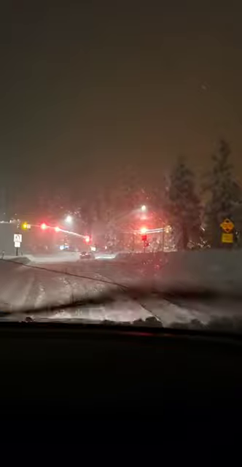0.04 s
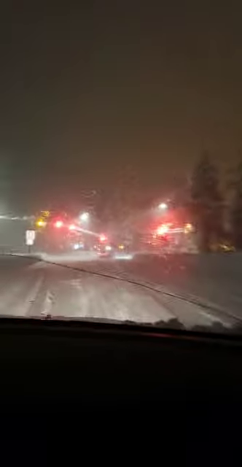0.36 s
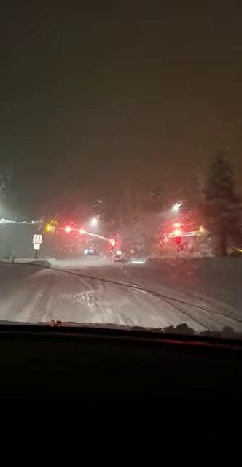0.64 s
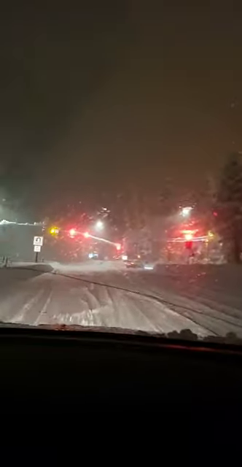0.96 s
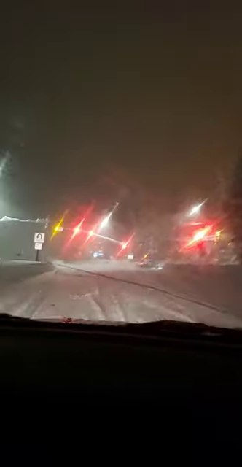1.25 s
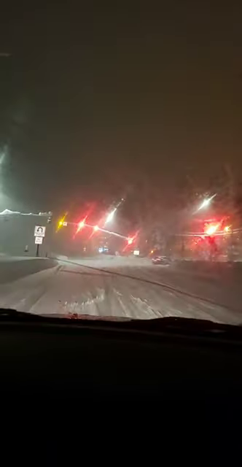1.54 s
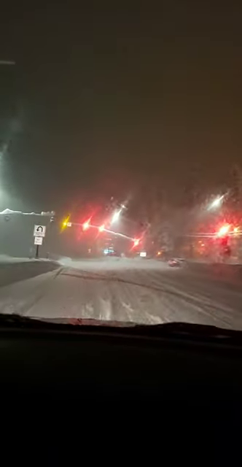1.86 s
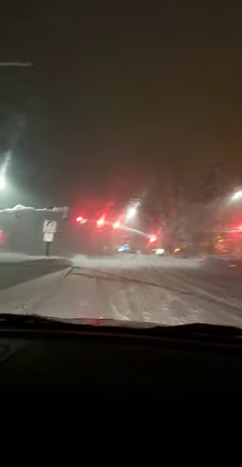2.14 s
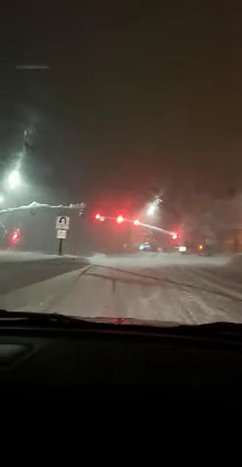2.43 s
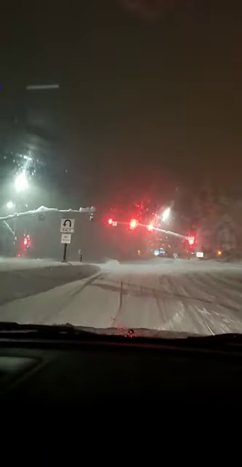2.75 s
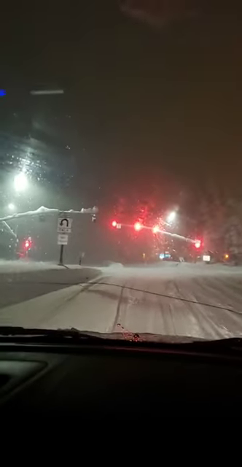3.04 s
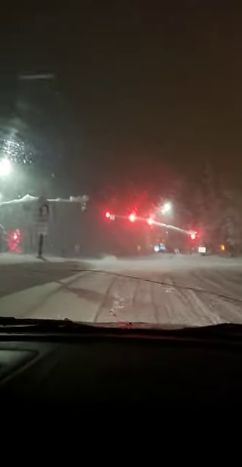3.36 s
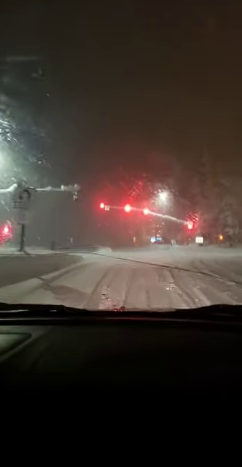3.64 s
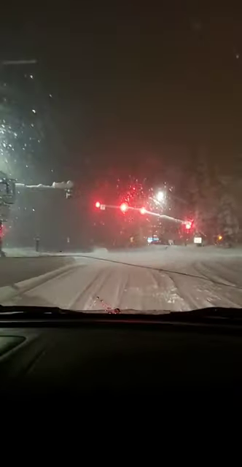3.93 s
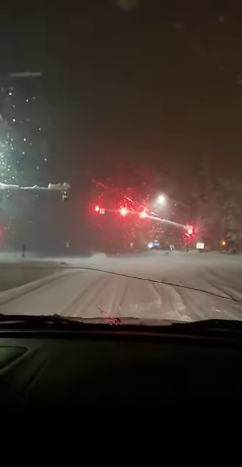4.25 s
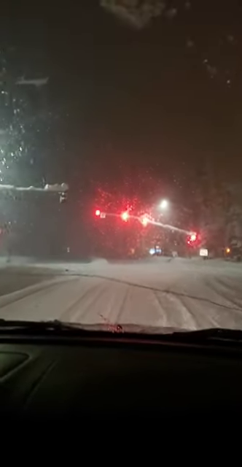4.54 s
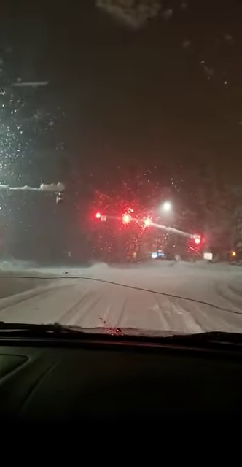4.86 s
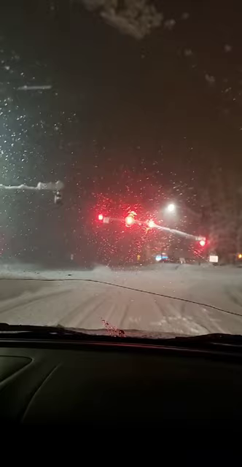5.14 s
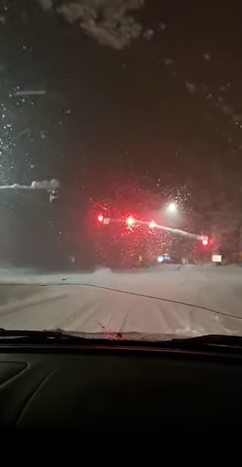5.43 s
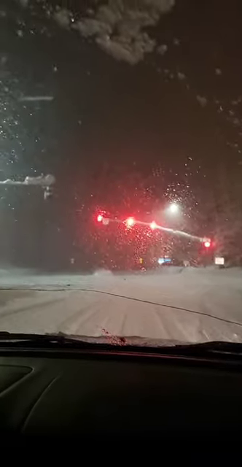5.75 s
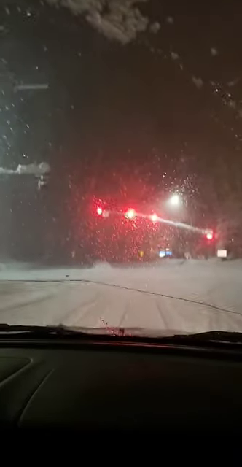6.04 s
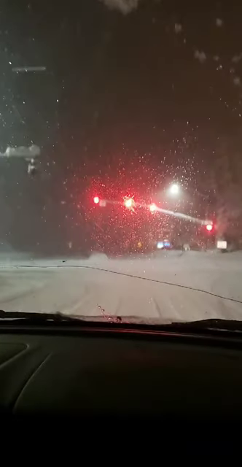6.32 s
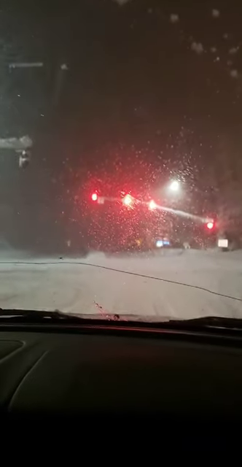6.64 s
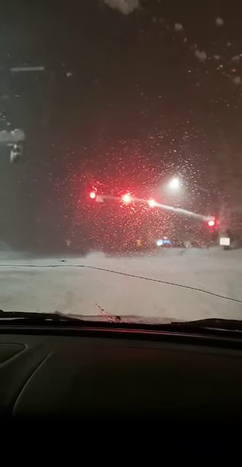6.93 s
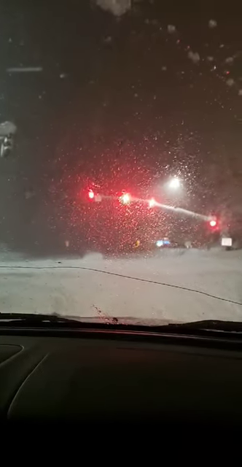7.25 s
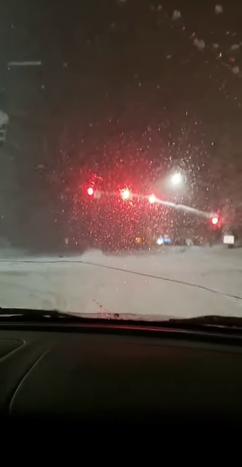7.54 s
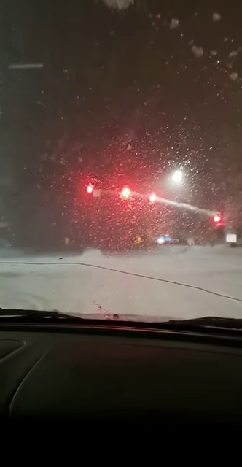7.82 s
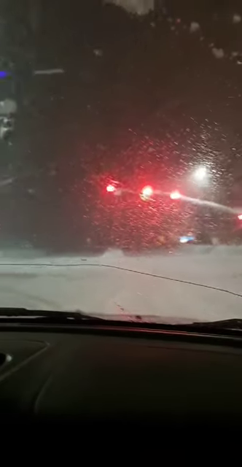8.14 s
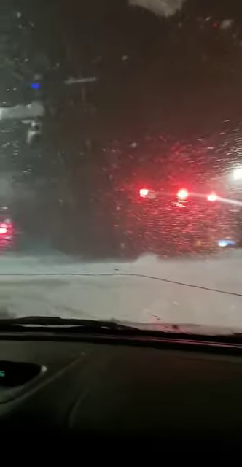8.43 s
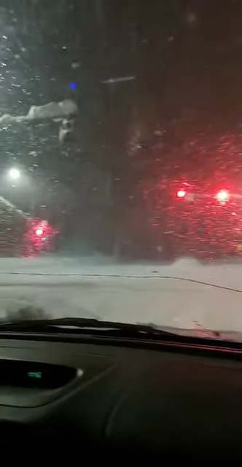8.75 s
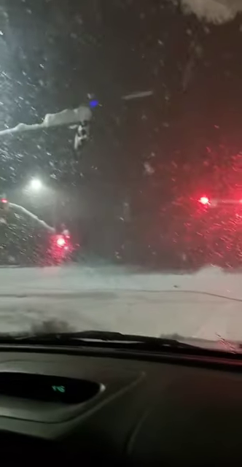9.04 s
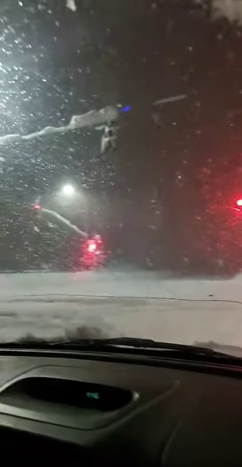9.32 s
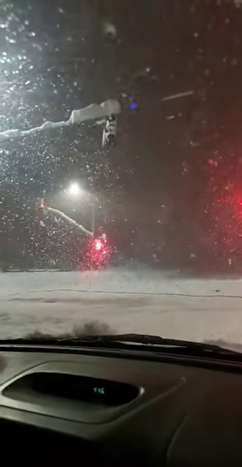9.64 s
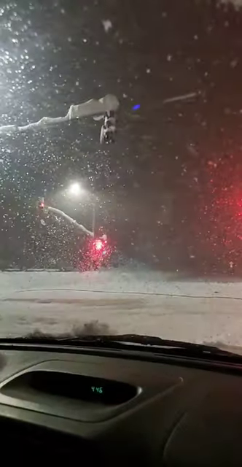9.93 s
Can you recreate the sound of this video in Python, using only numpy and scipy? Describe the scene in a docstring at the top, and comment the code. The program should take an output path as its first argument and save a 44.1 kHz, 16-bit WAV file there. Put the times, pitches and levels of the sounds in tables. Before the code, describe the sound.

A brief burst of close handling noise opens on a hand-held phone inside a moving car. Low road rumble carries on throughout, its hum dropping in pitch as the car slows over rutted snow. The wheels jolt softly a few times and loose plastic rattles faintly, while the heater blows steadily behind. Toward the end the boom eases a little, and light ticks and cloth rustle come from the grip.

```python
"""Low road rumble inside a car slowing down on snow, heard from a hand-held phone.
The wheels shake the cabin into a boom; the running-gear drone and the tread hum sink with the speed.
A hand scrapes over the phone at the start, and heater air rushes steadily through the ducts.
Small details sit behind: loose trim rattles on bumps, the case ticks in the grip,
a sleeve swishes, and skin and cloth squeak as they catch."""
import sys
import numpy as np
from scipy import signal
from scipy.fft import rfft, irfft
from scipy.io import wavfile
from scipy.ndimage import uniform_filter1d

SR = 44100
rng = np.random.default_rng(int(sys.argv[2]) if len(sys.argv) > 2 else 0)


def transcribe(signal):
    """Save signal, clipped to [-1, 1], as a 16-bit WAV file at the path in sys.argv[1]."""
    frames = np.atleast_2d(signal).T
    limited = np.clip(frames, -1, 1)
    pcm = np.round(limited * 32767).astype(np.int16)
    wavfile.write(sys.argv[1], SR, pcm)


N = 440118

BODY_DB, BOOM_DB, SNOW_DB, ROAR_DB = -34.5, -36.5, -43.5, -50.5  # base levels at cruising speed
BOOM_FALL_DB, SNOW_FALL_DB, ROAR_FALL_DB, DRONE_FALL_DB = 2.5, 4.5, 5.5, 2.5  # per halving of speed
DRONE_HZ, DRONE_DB, TREAD_HZ, TREAD_DB = 106, -44, 322.3, -55.5  # base values at cruising speed
CABIN_HZ, CABIN_WIDTH_HZ, DRONE_LIFT_DB = 82.66, 15, 16.5  # the cabin's air mode lifts the drone
FLOOR_HZ, FLOOR_WIDTH_HZ, TREAD_LIFT_DB = 174, 82, 9.5  # the floor's resonance lifts the tread hum
TURN_AIR_DB, TURN_ROAR_DB, TURN_BOOM_DB = 2.5, 3, -9.5  # mix shift as the phone turns to the vents
BUMP_SHARE = 0.65  # part of a jolt's dB that reaches the snow rumble and the tyre roar
# Braking towards a junction: (time [s], speed [share of cruising speed])
SPEED_CURVE = [(0, 0.97), (1.5, 1.004), (2.5, 0.83), (3.1, 0.79), (3.9, 0.59), (5, 0.51), (6.2, 0.39),
               (7.5, .4), (10, 0.4)]
# Road roughness, heaviest in the junction's rutted snow: (time [s], gain [dB])
RUT_CURVE = [(0, 0), (1.5, -0.5), (4.2, 4), (6.4, 4), (7.6, -0.5), (10, 1)]
# Ridges and rough patches jolting the wheels: (time [s], half length [s], boost [dB])
BUMP_CUES = [(.75, .1, 3.5), (2.85, 0.23, 4.5), (3.697, .08, 3), (4.05, 0.069, 4.5), (6.115, 0.064, 7.5),
             (6.8, 0.11, 4.5)]
# Sub-bass shake through the suspension: (frequency [Hz], gain [dB])
BODY_EQ = [(12, -24.5), (20, -11.5), (27, -9.5), (37, -1.5), (47, 1), (56, -5.5), (68, -7.5), (100, -25)]
# Rumble of packed snow under the tyres: (frequency [Hz], gain [dB])
SNOW_EQ = [(85, -19), (115, -3), (135, 2.5), (175, -0.5), (210, -7), (250, -15), (400, -42.5)]
# Low-mid tyre roar through the floor: (frequency [Hz], gain [dB])
ROAR_EQ = [(170, -11.5), (220, 2), (270, -0.5), (350, -3.5), (430, -19.5), (600, -33.5)]


def road():
    """The wheels shake the body and cabin air; drone and tread hum glide down through resonances."""
    t = np.arange(N) / SR
    speed, ruts_db, turn = curve(SPEED_CURVE), curve(RUT_CURVE), turn_to_vents()
    halvings = -np.log2(speed)
    drone_hz, tread_hz = DRONE_HZ * speed, TREAD_HZ * speed
    jolts_db = sum(db * np.exp(-((t - s) / half_s) ** 2) for s, half_s, db in BUMP_CUES)
    body_db = BODY_DB + ruts_db + jolts_db
    boom_db = BOOM_DB + ruts_db - BOOM_FALL_DB * halvings + TURN_BOOM_DB * turn
    snow_db = SNOW_DB + ruts_db + BUMP_SHARE * jolts_db - SNOW_FALL_DB * halvings
    roar_db = ROAR_DB + BUMP_SHARE * jolts_db - ROAR_FALL_DB * halvings + TURN_ROAR_DB * turn
    cabin_lift_db = DRONE_LIFT_DB * resonance(drone_hz, CABIN_HZ, CABIN_WIDTH_HZ)
    drone_db = DRONE_DB - DRONE_FALL_DB * halvings + cabin_lift_db
    tread_db = TREAD_DB + TREAD_LIFT_DB * resonance(tread_hz, FLOOR_HZ, FLOOR_WIDTH_HZ)
    body = steady(colour(noise(), BODY_EQ)) * undb(body_db)
    boom = steady(ring(noise(), [(CABIN_HZ, 22.7, 0)])) * undb(boom_db)  # lengthwise air mode
    snow = colour(noise(), SNOW_EQ) * undb(snow_db)
    roar = colour(noise(), ROAR_EQ) * undb(roar_db)
    drone = steady(hum(drone_hz, width_hz=5.8)) * undb(drone_db)
    tread = hum(tread_hz, width_hz=24) * undb(tread_db)
    return body + boom + snow + roar + drone + tread


# Strokes of the hand over the case: (start [s], length [s], level [dB])
STROKE_CUES = [(0.033, 0.05, -31), (0.082, 0.059, -27), (.16, .058, -32.5), (0.254, 0.05, -45)]
# Dark tone of friction on the case: (frequency [Hz], gain [dB])
CASE_EQ = [(120, -3), (250, 5.5), (400, 2), (600, 0), (1000, -6.5), (1800, -13), (2800, -13), (3400, -19),
           (5000, -24.5), (6800, -35.5), (8500, -49), (12000, -43), (15500, -40)]
# Ring of the scraped case: (frequency [Hz], width [Hz], gain [dB])
SCRAPE_MODES = [(272, 18, 1), (409, 26, -3), (539, 22, -5), (694, 30, 3), (776, 26, -2), (925, 22, -7),
                (962, 22, -7), (1157, 28, -13), (1529, 28, -15), (2804, 45, -15)]
# Dull boom of the case under the palm: (frequency [Hz], width [Hz], gain [dB])
PUSH_MODES = [(109.1, 17, 7), (152, 17, -13.5), (163, 34, -9), (186.6, 33, -10)]


def hand(ring_db=-8, push_db=-22):
    """Skin sticks and slips on the case and rings it, while the palm pushes out a dull boom."""
    strokes = sum(undb(db) * press(s, length, release_s=0.017) for s, length, db in STROKE_CUES)
    push = undb(push_db) * press(start_s=0.029, length_s=0.22, release_s=0.06)
    friction = slips(per_second=4600, spread_db=-1.0) * strokes
    scrape = colour(friction, CASE_EQ) + ring(friction, SCRAPE_MODES) * undb(ring_db)
    boom = steady(ring(noise(), PUSH_MODES), window_s=0.072) * push
    return scrape + boom


# Fader ride of the heater air: (time [s], level [dB])
AIR_CURVE = [(0, -57.5), (1.8, -59.5), (2.8, -58), (10, -57.5)]
# Broad rush of the air: (frequency [Hz], gain [dB])
AIR_EQ = [(200, -1.5), (450, 1.5), (590, -3), (900, -7), (1600, -9.5), (1800, -15.5), (2750, -14),
          (3200, -22), (5200, -16), (6300, -22), (7200, -35), (8200, -47), (10300, -41.5), (12500, -29.5),
          (15500, -36)]
# Hollow duct resonances: (frequency [Hz], width [Hz], boost [dB])
DUCT_PEAKS = [(685, 130, 5.5), (785, 131, 10.5), (1067, 100, 6), (1327, 110, 5.5), (1626, 36, 5.5),
              (2090, 75, 4.5), (2480, 120, 1.5), (2700, 240, 3), (4470, 150, 3.5), (6950, 270, 7)]
# Thin whine of the blower motor: (frequency [Hz], level [dB])
WHINE_TONES = [(2186, -83.5), (5238, -91.5)]


def heater(flutter_db=0.61, pitch_drift=.0006):
    """Air rushes through the ducts with a slight flutter; the motor whines faintly."""
    rush = colour(noise(), AIR_EQ, DUCT_PEAKS)
    air_db = curve(AIR_CURVE) + TURN_AIR_DB * turn_to_vents() + flutter_db * wander(2.3)
    motor_time = np.cumsum(1 + pitch_drift * wander(1.9)) / SR
    whine = sum(undb(db) * unit(np.sin(2 * np.pi * hz * motor_time)) for hz, db in WHINE_TONES)
    return rush * undb(air_db) + whine


# Fingers shifting their hold: (start [s], scuff level [dB], scuff length [s], thud level [dB])
FINGER_CUES = [(0.544, -55, 0.02, -63), (0.576, -42, 0.045, -32.5), (0.677, -55, 0.041, -53),
               (1.257, -47, 0.047, -35)]
# Soft fingertip scuff: (frequency [Hz], gain [dB])
SCUFF_EQ = [(180, -11.5), (350, 5), (650, 3.5), (1000, -2), (1800, -14), (2800, -17), (4500, -23),
            (6500, -33.5), (8500, -55)]


def fingers(thud_hz=157.0, thud_width_hz=61, thud_s=0.054):
    """A fingertip scuffs the case and lands with a soft thud."""
    scuffs = sum(undb(db) * swell(s, length) for s, db, length, _ in FINGER_CUES)
    thuds = sum(undb(db) * swell(s + length / 2, thud_s) for s, _, length, db in FINGER_CUES)
    friction = slips(per_second=4500, spread_db=7.0) * scuffs
    return colour(friction, SCUFF_EQ) + ring(noise(), [(thud_hz, thud_width_hz, 0)]) * thuds


# Skin and cloth squeaks, and a brief tick of the case near 8.47 s: (start [s], length [s], from pitch [Hz], to
# pitch [Hz], width [Hz], level [dB])
SQUEAK_CUES = [(0.256, 0.033, 700, 730, 60, -39), (0.285, 0.072, 2890, 2800, 200, -64),
               (0.326, .03, 838, 830, 59.6, -56), (0.402, 0.072, 507, 409, 65, -47),
               (0.495, 0.036, 950, 1020, 88.5, -57.5), (8.467, 0.027, 2330, 2240, 450, -56.5),
               (8.47, 0.029, 1620, 1460, 400, -55.5), (9.074, 0.073, 2110, 1950, 300, -62),
               (9.44, .1, 4430, 4300, 900, -60), (9.517, 0.095, 4950, 5150, 800, -61),
               (9.869, 0.013, 2190, 2190, 350, -61)]


def squeaks():
    """Short, ragged chirps where skin or cloth catches; the pair near 8.47 s is a tick of the case."""
    chirps = np.zeros(N)
    for s, length, start_hz, end_hz, width_hz, db in SQUEAK_CUES:
        glide_hz = curve([(s, start_hz), (s + length, end_hz)])
        chirps += hum(glide_hz, width_hz) * swell(s, length) * undb(db)
    return chirps


# The case ticking in the grip: (time [s], peak level [dB])
TICK_CUES = [(8.2065, -45.5), (8.5988, -38), (8.9704, -36), (9.1734, -38), (9.3184, -38.5)]
# Dry ring of one tick: (frequency [Hz], 60 dB decay time [s], gain [dB])
SNAP_MODES = [(2380, 0.0029, 0), (1110, 0.004, -3)]


def case_ticks(attack_s=0.00066):
    """The grip draws tiny, well damped snaps from the phone case."""
    t = np.arange(SR // 100) / SR
    snap = sum(undb(db) * np.sin(2 * np.pi * hz * t) * undb(-60 * t / t60) for hz, t60, db in SNAP_MODES)
    snap *= (1 - np.exp(-t / attack_s)) ** 2  # soft contact
    hits = np.zeros(N)
    for s, db in TICK_CUES:
        hits[int(s * SR)] = undb(db)
    return signal.fftconvolve(hits, snap / np.abs(snap).max())[:N]


# Jolts to the loose trim: (time [s], level [dB])
RATTLE_CUES = [(0.443, -67), (0.726, -70.5), (1.542, -70), (1.58, -64.5), (1.619, -67), (2.455, -67),
               (2.789, -72), (3.305, -69), (3.444, -65), (4.254, -66.5), (4.292, -68), (6.034, -60),
               (6.077, -63), (6.119, -66), (6.142, -60), (6.18, -69.5), (6.243, -64), (6.27, -61.5)]
# Bright plastic resonances: (frequency [Hz], width [Hz], gain [dB])
TRIM_MODES = [(1490, 900, -5.5), (2610, 260, 2.5), (3380, 640, -2.5), (4300, 900, -3.5), (5130, 940, -5.5),
              (5750, 530, -7.5)]
# The seats soak up the rattle's top end: (frequency [Hz], gain [dB])
SEAT_EQ = [(900, 0.5), (6000, 1.5), (7000, -5), (8500, -15)]


def trim_rattle(decay_s=0.012):
    """Each jolt sets a loose plastic part chattering for a moment."""
    t = np.arange(N) / SR
    jolts = sum(undb(db) * (t >= s) * np.exp(-np.abs(t - s) / decay_s) for s, db in RATTLE_CUES)
    chatter = slips(per_second=4000, spread_db=0.5) * jolts
    return colour(ring(chatter, TRIM_MODES), SEAT_EQ)


# Sleeve moves: (peak time [s], fade [s], swish level [dB], hiss level [dB])
SLIDE_CUES = [(1.08, .035, -73, -86), (1.31, 0.031, -75, -85), (3.3, 0.04, -77.5, -81),
              (6.98, 0.065, -81, -85), (7.69, 0.062, -71, -74), (8.3, .035, -73, -81),
              (8.53, 0.042, -66, -74), (8.96, 0.15, -65, -73), (9.022, 0.037, -57.5, -58.5),
              (9.52, .12, -72.5, -92), (9.88, .08, -81, -87)]
# Broad cloth swish: (frequency [Hz], gain [dB])
SWISH_EQ = [(700, -3.5), (1300, 3.5), (2300, 5.5), (3400, -0.5), (4800, 4.5), (6500, 2.5), (8500, -21),
            (11000, -24.5), (15500, -33.5)]
# Airy hiss of the fibres: (frequency [Hz], gain [dB])
FIBRE_EQ = [(6000, -14), (9500, -13), (11000, -7.5), (12600, 2.5), (15500, 0)]


def sleeve():
    """Jacket cloth slides, swelling and fading evenly: a broad swish and a fine hiss from its fibres."""
    t = np.arange(N) / SR
    swish_gain = hiss_gain = 0
    for s, fade_s, swish_db, hiss_db in SLIDE_CUES:
        motion = 1 / np.cosh(np.clip((t - s) / fade_s, -20, 20))
        swish_gain += undb(swish_db) * motion
        hiss_gain += undb(hiss_db) * motion
    swish = colour(slips(per_second=18000, spread_db=5.0), SWISH_EQ) * swish_gain
    return swish + colour(noise(), FIBRE_EQ) * hiss_gain


def cabin_reverb(x, wet_db, t60_s):
    """Glass and dashboard return quick, dense echoes that the seats soon soak up."""
    t = np.arange(SR // 10) / SR
    echoes = rng.standard_normal(len(t)) * undb(-60 * t / t60_s)
    wet = signal.fftconvolve(x, echoes / np.linalg.norm(echoes))[:N]
    return (x + undb(wet_db) * wet) / np.hypot(1, undb(wet_db))


def turn_to_vents(start_s=8.23, length_s=1):
    """How far the phone has turned to the vents, 0-1."""
    return np.clip((np.arange(N) / SR - start_s) / length_s, 0, 1)


def undb(db):
    """Decibels to gain."""
    return 10 ** (np.asarray(db) / 20)


def unit(x):
    """Scale to rms 1."""
    return x / np.sqrt(np.mean(x ** 2))


def curve(points):
    """Straight-line automation through (time [s], value) points."""
    return np.interp(np.arange(N) / SR, *np.transpose(points))


def swell(start_s, length_s):
    """A rounded rise and fall."""
    progress = np.clip((np.arange(N) / SR - start_s) / length_s, 0, 1)
    return np.sqrt(np.abs(np.sin(np.pi * progress)))


def press(start_s, length_s, release_s, attack_s=.016):
    """A quick rise, a hold and an exponential release."""
    t = np.arange(N) / SR - start_s
    return np.clip(t / attack_s, 0, 1) * np.exp(-np.maximum(t - length_s, 0) / release_s)


def noise():
    """White noise."""
    return rng.standard_normal(N)


def wander(rate_hz):
    """Smooth random modulation at rms 1, changing about rate_hz times a second."""
    hz = np.arange(N // 2 + 1) * SR / N
    return unit(irfft(rfft(noise()) * np.exp(-.5 * (hz / rate_hz) ** 2), N))


def hum(hz, width_hz):
    """A ragged tone: a narrow band of noise around a moving pitch."""
    phase = 2 * np.pi * np.cumsum(hz) / SR
    return unit(wander(width_hz / 2) * np.cos(phase) + wander(width_hz / 2) * np.sin(phase))


def slips(per_second, spread_db):
    """Dense stick-slip clicks of uneven size."""
    clicks = (rng.random(N) < per_second / SR) * noise()
    return unit(clicks * undb(spread_db * np.clip(noise(), -2, 2)))


def resonance(hz, centre_hz, width_hz):
    """How near a pitch is to a resonance: 1 on it, 0 far away."""
    return 1 / (1 + (2 * (hz - centre_hz) / width_hz) ** 2)


def colour(x, eq, peaks=()):
    """Filter by a (Hz, dB) EQ curve with (Hz, width, dB) peaks on it; white noise keeps its level."""
    hz = np.maximum(np.arange(N // 2 + 1) * SR / N, 1)
    eq_hz, eq_db = np.transpose(eq)
    gain_db = np.interp(np.log(hz), np.log(eq_hz), eq_db)
    octaves_outside = np.abs(np.log2(hz / np.clip(hz, eq_hz.min(), eq_hz.max())))
    gain_db -= 24 * octaves_outside  # roll-off past both ends
    for centre_hz, width_hz, boost_db in peaks:
        gain_db += boost_db * resonance(hz, centre_hz, width_hz)
    return irfft(rfft(x) * unit(undb(gain_db)), N)


def ring(x, modes):
    """Drive (Hz, width, dB) resonators; white noise keeps its level."""
    hz = np.maximum(np.arange(N // 2 + 1) * SR / N, 1)
    response = 0
    for centre_hz, width_hz, db in modes:
        detuning = (hz / centre_hz - centre_hz / hz) * centre_hz / (1.23 * width_hz)
        response += undb(db) / (1 + 1j * detuning) ** 2
    return irfft(rfft(x) * response / np.sqrt(np.mean(np.abs(response) ** 2)), N)


def steady(x, window_s=0.27):
    """Even out the slow swells of a rumble, leaving its quick throb."""
    return x / np.sqrt(uniform_filter1d(x ** 2, int(window_s * SR)) + 1e-9)


def scene():
    """The mono mix at the phone; the trim rattles from across the cabin."""
    rattles = cabin_reverb(trim_rattle(), wet_db=-4.5, t60_s=.05)
    mix = road() + heater() + rattles + hand() + fingers() + case_ticks() + sleeve() + squeaks()
    return mix[None]


def record(dry, start_s=.035, fade_s=.01, top_hz=15600):
    """The microphone opens after a moment; the sound ends with a brief soft fade; a steep low-pass cuts the
    top."""
    t = np.arange(N) / SR
    fades = np.clip(np.minimum(t - start_s, t[-1] - t) / fade_s, 0, 1)
    lowpass = signal.ellip(12, .2, 80, top_hz, fs=SR, output="sos")
    return signal.sosfilt(lowpass, dry * fades)


dry = scene()
out = record(dry)
transcribe(out)
```